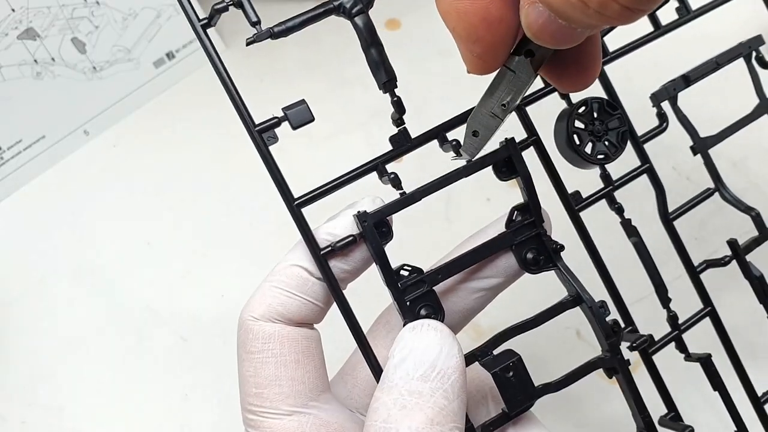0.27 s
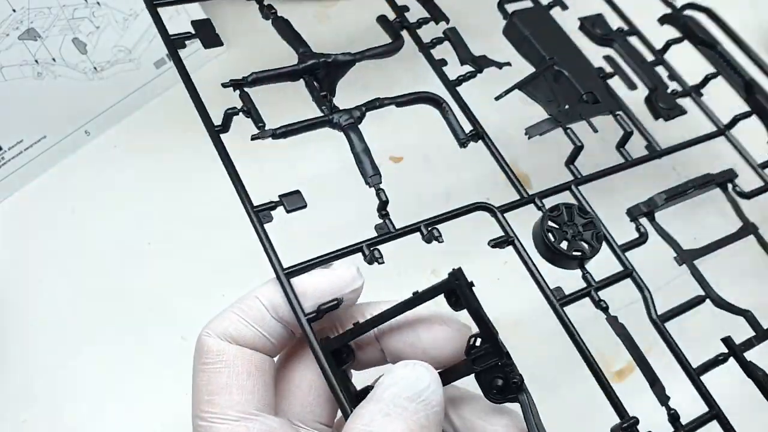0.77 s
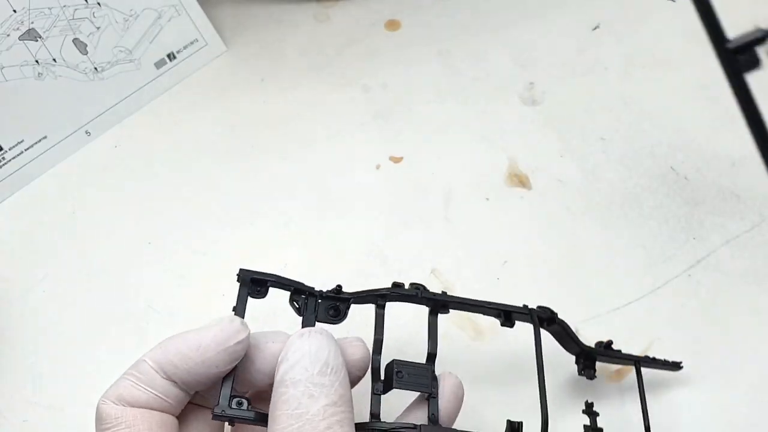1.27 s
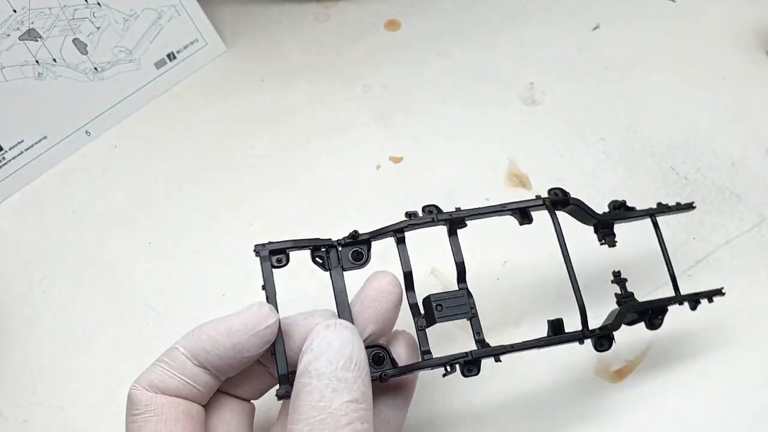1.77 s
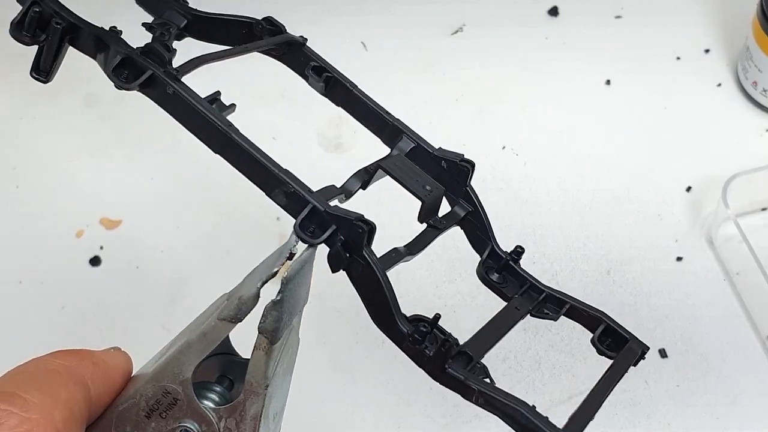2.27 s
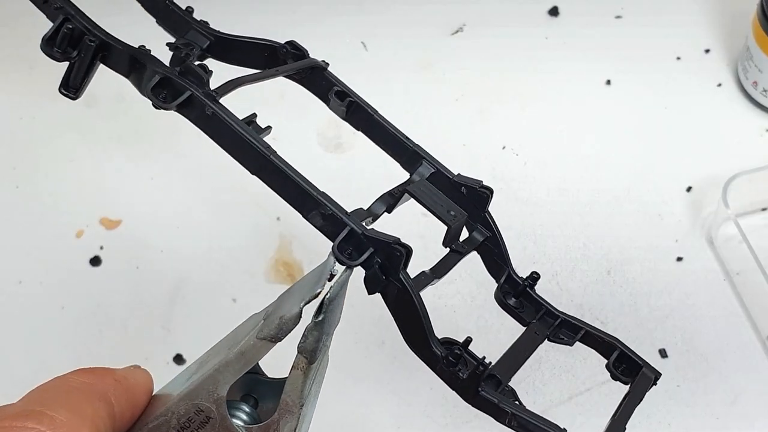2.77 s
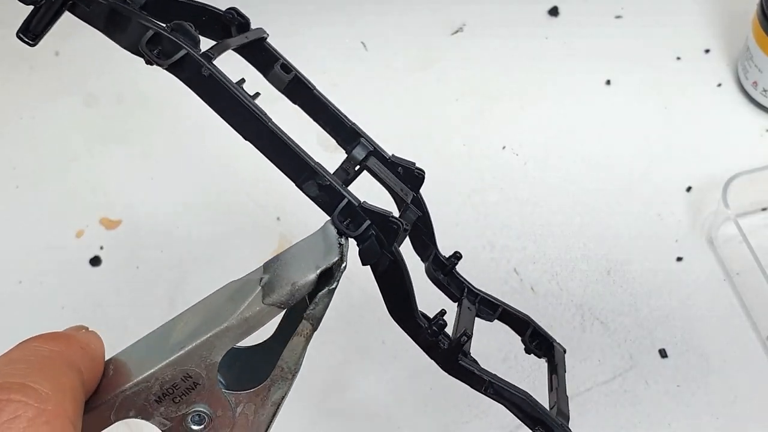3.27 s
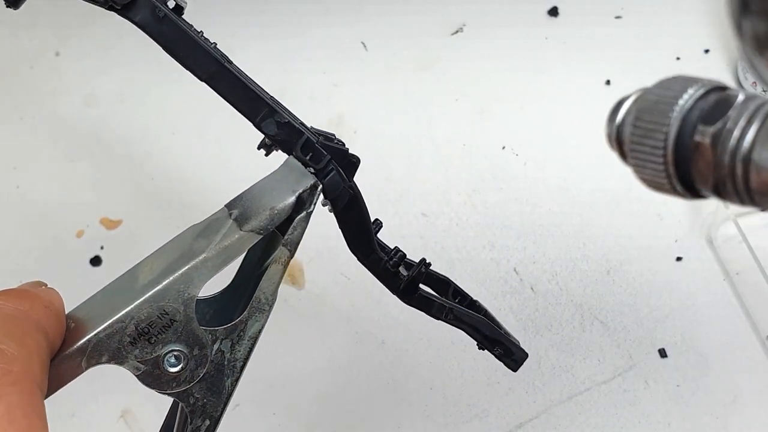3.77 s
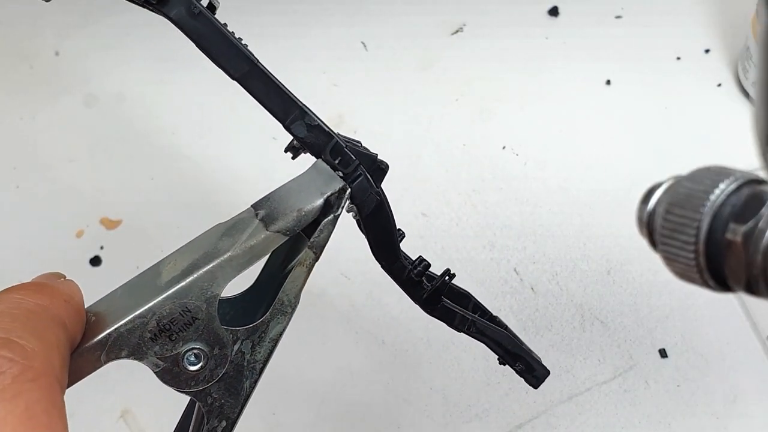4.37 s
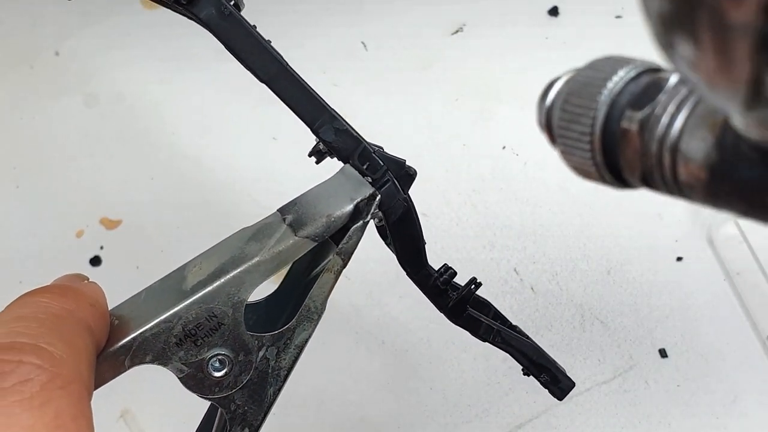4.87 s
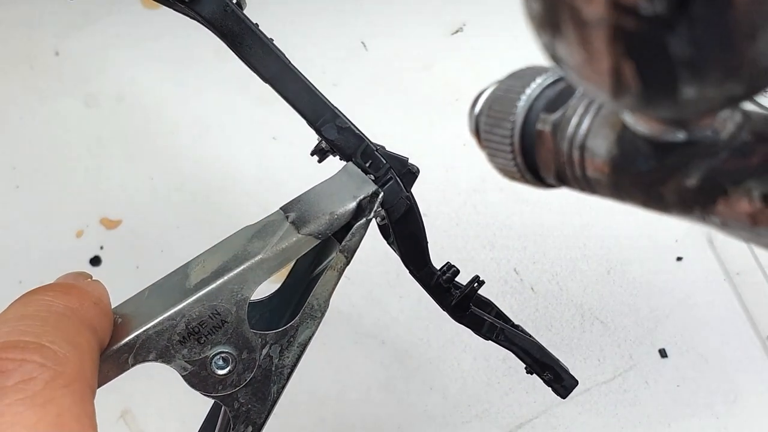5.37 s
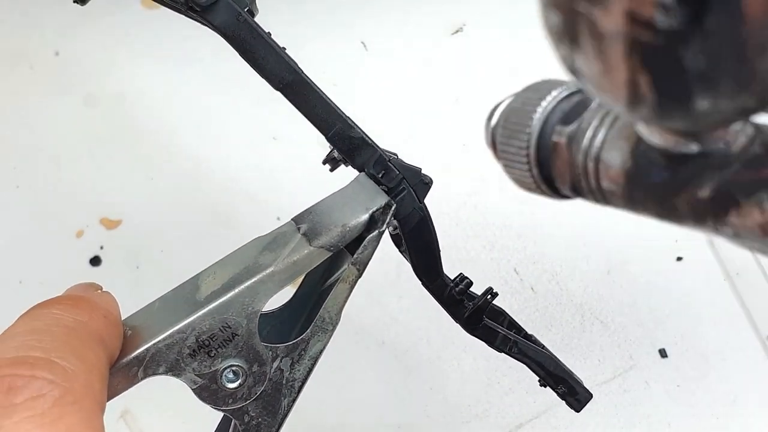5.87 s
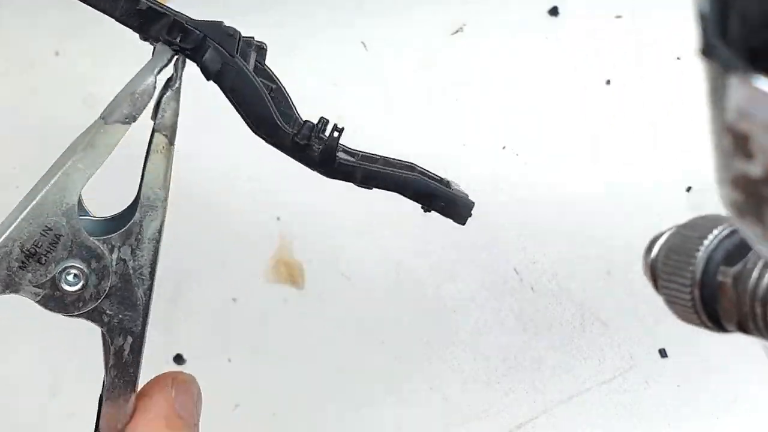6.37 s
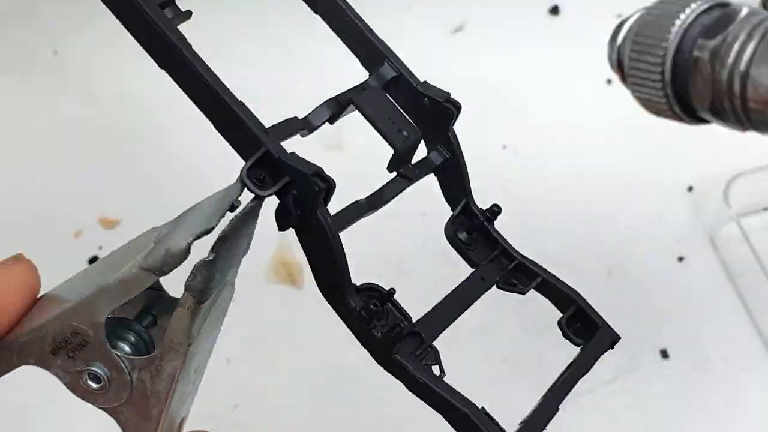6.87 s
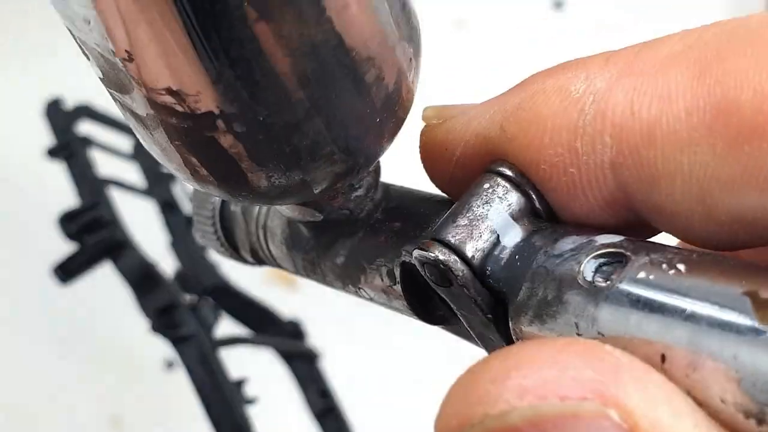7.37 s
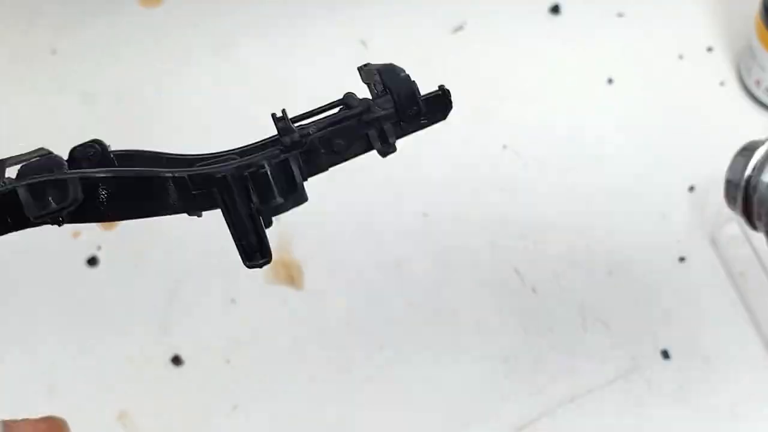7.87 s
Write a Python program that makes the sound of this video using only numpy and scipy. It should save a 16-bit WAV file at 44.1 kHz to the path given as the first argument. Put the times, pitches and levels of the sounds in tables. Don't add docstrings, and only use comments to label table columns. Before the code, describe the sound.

Dry, close phone pickup at a small workbench: gloved fingers rub light plastic, a sharp double-edged snip cracks, smaller snaps follow, then a part taps and bounces. The quiet room abruptly becomes a buzzing low compressor hum through the table. After some light handling, a steady airbrush hiss joins, mostly high and breathy, then fluctuates in quicker strokes with small bumps and clicks, continuing to the end.

```python
import sys
import numpy as np
from scipy import signal
from scipy.fft import rfft, irfft, next_fast_len
from scipy.io import wavfile
from scipy.ndimage import uniform_filter1d, minimum_filter1d

SR = 44100
rng = np.random.default_rng(int(sys.argv[2]) if len(sys.argv) > 2 else 0)


def volts(x):
    e = np.asarray(x, float) / 20
    return 10 ** e


def int16_out(signal):
    q = np.round(np.clip(np.atleast_2d(signal).T, -1, 1) * 32767)
    wavfile.write(sys.argv[1], SR, q.astype(np.int16))


N = 357210
SIZE = next_fast_len(N)
HZ = np.maximum(np.arange(SIZE // 2 + 1) * SR / SIZE, 1)
T = np.arange(N) / SR
CHANGE_S = 2.0225
SHAFT_HZ = 29.55
FAST_S, PIECE_SAMPLES = 5.753, 1024

# hz, share_0_1
LIKENESS = [(60, 0.96), (130, 0.99), (290, 1), (640, 0.75), (1410, 0), (3100, 0.55), (6820, -0.1),
            (15000, 0.07)]


def level(x, db):
    return x * volts(db) / np.sqrt(np.mean(x ** 2))


def on_hz(table, outside=None):
    hz, value = np.transpose(table)
    return np.interp(np.log(HZ), np.log(hz), value, outside, outside)


def on_time(table):
    s, *columns = np.transpose(table)
    return [np.interp(T, s, c) for c in columns]


def pan(db):
    return volts(np.array([db, -db]) / 2).reshape(2, -1)


def hiss(gain, alike):
    alike = np.clip(alike, 0, .995)
    mid, side = rfft(rng.standard_normal((2, SIZE)))
    mid = mid * np.sqrt(1 + alike)
    side = side * np.sqrt(1 - alike)
    return level(irfft(gain * np.array([mid + side, mid - side]), SIZE)[:, :N], 0)


def walk(rate_hz):
    k = int(SR / rate_hz)
    held = np.repeat(rng.standard_normal(N // k + 1), k)
    x = uniform_filter1d(uniform_filter1d(held, k), k)[:N]
    return x / x.std()


def ring(x, modes):
    s = 1j * HZ
    gain = 0
    for k, (hz, width_hz, db) in enumerate(modes):
        gain = gain + (-1) ** k * volts(db) * width_hz * s / (s * s + width_hz * s + hz * hz)
    return irfft(rfft(x, SIZE) * gain / np.sqrt(np.mean(abs(gain) ** 2)), SIZE)[:, :N]


def echoes(x, t60_s, wet_db):
    t = np.arange(int(.2 * SR)) / SR
    tail = rng.standard_normal((2, len(t))) * volts(-60 * t / t60_s)
    tail *= volts(wet_db) / np.sqrt((tail ** 2).sum(1, keepdims=True))
    tail[:, 0] = 1
    return signal.fftconvolve(x, tail, axes=1)[:, :x.shape[1]] / np.sqrt(1 + volts(2 * wet_db))


def plastic():
    # start_s, peak_db, deep_ring_db, frame_ring_db, edge_ring_db
    snips = [(0.2267, -32.5, -13, -18.5, -10.5), (0.256, -16, -32, -34, -22), (0.2574, -21, -30, -31, -16),
             (0.2616, -26, -28, -23, -14), (0.6639, -33.5, -23, -13, -1.5), (.868, -34, -28, -22, -24),
             (0.8705, -34, -31.5, -12, -16), (0.8723, -32.5, -34, -21, -20), (.8915, -46, -25.5, -26, -12),
             (1.2435, -65, -21, -19, -19), (1.8528, -27.5, -19, -7, -8), (1.855, -33.5, -14, -10, -5),
             (1.8583, -41, -14, -12, -2), (1.9244, -50, -5, 2, 1.5), (2.862, -47.5, -3, -11, -6),
             (2.883, -27, -25, -34, -28)]
    # start_s, length_s, air_db, desk_db, part_db
    rubs = [(0, .06, -82, 19.5, 5), (.69, 0.13, -83, -3, -4), (0.038, 0.075, -73, 20, 5.5),
            (0.063, 0.18, -72.5, 13, 7.5), (0.218, 0.037, -57, -1, -7), (0.241, 0.045, -62, 12, 15),
            (.268, .02, -63, 12, 14), (.828, .009, -53, -25, -16), (.79, .026, -59, -18, -18),
            (0.307, .05, -77, -12, -19), (.47, 0.087, -73, -7, -8), (0.542, 0.14, -72, 9, -8),
            (0.592, 0.063, -60, 3.5, 2.5), (0.652, 0.06, -69.5, 13.5, -6), (0.775, 0.045, -70, -12, -12),
            (0.795, 0.053, -70, -11, -10), (0.887, 0.015, -61.5, -23, -15), (0.922, 0.064, -60, -4, 3.5),
            (.943, 0.03, -62, -8, -2), (0.947, 0.15, -73.5, 1, -1.5), (1.24, 0.21, -83, -5, -10),
            (1.4, .4, -85.5, -6.5, -2.5), (1.844, .066, -63.5, 9, 5.5), (1.901, 0.028, -61, 2, -2),
            (1.915, 0.16, -71, 10, 2), (2.904, 0.16, -65, -24, -20), (3.193, 0.57, -72, 8, 5.5)]
    # hz, width_hz, level_db
    deep_modes = [(170, 95, 4), (443, 184, -2), (626, 210, -0.5), (900, 210, -2.5)]
    frame_modes = [(1230, 95, -2.5), (1470, 86, 3), (1930, 210, -3)]
    edge_modes = [(2604, 210, -1), (3185, 140, 0), (4070, 500, -1), (5280, 490, -0.5), (5990, 1200, -5.5)]
    air_modes = [(10660, 2400, 1), (12480, 1400, 3.5), (14050, 2500, -6)]
    hands_pan_db = [-1.5, -1.5, -4, -7]

    crack, rub = np.zeros((2, 4, N))
    for s, db, deep_db, frame_db, edge_db in snips:
        t60_s = 0.023 * np.exp(-0.0645 * (db + 26.5))
        span = slice(int(s * SR), int((s + .2) * SR))
        t = T[span] - T[span][0]
        spike = 1 + 0.91 * np.exp(-t / 0.0019)
        for k, (rel_db, longer) in enumerate([(deep_db, 2.5), (frame_db, 1.8), (edge_db, 1.2), (0, 1)]):
            crack[k, span] += spike * volts(db + rel_db - 9.0 - 60 * t / (t60_s * longer))
    for s, length_s, db, desk_db, part_db in rubs:
        span = slice(int(s * SR), int((s + length_s) * SR))
        part = np.clip((T[span] - s) / length_s, 0, 1)
        swell = np.minimum(part / 0.18, 1) * np.minimum((1 - part) / 0.43, 1) * volts(-5 * part)
        rub[:, span] += np.outer(volts(db + np.array([desk_db, part_db, part_db - 3, 0])), swell)
    drive = crack * volts(2.5 * walk(1500)) + rub * volts(2.6 * walk(400))
    modes = (deep_modes, frame_modes, edge_modes, air_modes)
    side = np.where(T < CHANGE_S, 1, -.3)
    out = 0
    for d, alike, m, pan_db in zip(drive, (0.54, 0.27, 0.3, 0.35), modes, hands_pan_db):
        out = out + ring(d * hiss(1, alike), m) * pan(pan_db * side)
    return out


def ticks():
    # start_s, level_db, centre_hz
    tick_list = [(.2273, -32, 9000), (.2565, -17, 11500), (.2575, -20, 12000), (.2582, -17, 11500),
                 (.2590, -21, 11000), (.2620, -24, 10500), (.2636, -26, 8000), (.6636, -24, 6000),
                 (.6648, -32, 10000), (.8696, -30, 11000), (.8712, -31, 13000), (.875, -31, 12500),
                 (.8731, -26, 12500), (1.8565, -32, 4500), (1.9265, -42, 3500)]
    out, t = np.zeros(N), T[:200]
    for s, db, hz in tick_list:
        decay = np.exp(-t * hz / 0.796)
        out[int(s * SR):int(s * SR) + len(t)] -= volts(db + 4) * np.sin(2 * np.pi * hz * t) * decay
    left = np.roll(out, 2)
    return echoes(np.array([left, out]), .02, -5) * pan(-5)


def landings():
    # start_s, level_db, contact_s
    touches = [
        (1.853, -38.5, 0.0002),
        (1.8555, -40, .0003),
        (1.8637, -37, .002),
        (1.925, -44.5, .0002),
        (1.937, -51, .0004),
        (1.948, -49, 0.0005),
    ]
    # hz, level_db, t60_s
    part_modes = [(129, 1.5, 0.14), (623, -4, 0.084), (846, -1.5, .07), (966, 0, 0.087), (1260, 1.5, 0.043),
                  (1550, -1.5, .035), (1800, -5, .04), (2520, -14, .03), (3800, -9, .04), (4400, -8, .03),
                  (5250, -10, .025)]
    out = np.zeros(N)
    t = T[:int(.3 * SR)]
    hz, db, t60_s = np.transpose(part_modes)[:, :, None]
    chances = rng.standard_normal((len(touches), len(part_modes), 1))
    for (s, hit_db, contact_s), chance in zip(touches, chances):
        strength = volts(hit_db + db + 2.1 * chance - 60 * t / t60_s) / (1 + (hz * contact_s) ** 2)
        modes = strength * np.sin(2 * np.pi * hz * (1 + 0.015 * chance) * t)
        out[int(s * SR):int(s * SR) + len(t)] += modes.sum(0) * (1 - np.exp(-t / 0.0012))
    return out * volts(2.5 * walk(600)) * (T < CHANGE_S - .004) * pan(-3)


def tones(table, waver, rate_hz):
    out = 0
    for s, length_s, hz, db in table:
        swell = np.sin(np.pi * np.clip((T - s) / length_s, 0, 1)) ** 0.31 * volts(2.76 * walk(43.98))
        phase = 2 * np.pi * np.cumsum(hz * (1 + waver * walk(rate_hz))) / SR
        out = out + volts(db) * swell * np.sin(phase)
    return out


def creaks():
    # start_s, length_s, pitch_hz, level_db
    creak_list = [(.598, .024, 3250, -55), (.6, 0.02, 1700, -57), (.618, .02, 1750, -61),
                  (.922, 0.016, 1500, -53), (.94, .028, 1520, -52.5), (0.957, .012, 1300, -54),
                  (.97, .013, 1500, -61), (.243, .014, 1500, -53), (.87, .015, 1520, -51)]
    return tones(creak_list, .045, 300) * pan(-5.5)


def sweeps():
    # start_s, swell_db, drop_db, recovery_s
    passes = [(5.77, 1, 0.5, 0.076), (6.439, 2, -4.5, 0.086), (6.739, -1.5, -4.5, 0.043),
              (7.18, -3.5, -4, 1), (7.525, 4, 2, 0.087), (7.699, 4.5, 0, 0.12), (7.824, 2, -3, 0.04)]
    before, after = 0, 0
    for s, swell_db, drop_db, recovery_s in passes:
        before = before + swell_db * np.exp(-abs(T - s) / 0.066) * (T < s)
        recovery = np.exp(-(np.maximum(T - s, 0) / recovery_s) ** 2)
        after = after + drop_db * recovery * np.clip((T - s) / 0.0091, 0, 1)
    return before, after


def airbrush():
    # start_s, jet_db, paint_wash_db
    nozzle = [
        (3.96, -36.5, -11),
        (4.19, -40, -8),
        (4.6, -36, -9.5),
        (5.23, -38, -7),
        (5.74, -36.5, -8),
        (5.77, -38, -7),
        (6.4, -38, -8.5),
        (8.1, -36, -6),
    ]
    # hz, level_db_per_hz
    jet_spectrum = [(4410, -20.5), (7500, -13), (9380, -3.5), (10500, 5), (13700, 4), (15600, -0.5),
                    (16100, -28.5), (16300, -26)]
    wash_spectrum = [(260, -35), (450, -14), (603, -1), (668, -3.5), (980, -4.5), (1380, -10.5), (1950, -6),
                     (2860, -6.5), (4200, -6.5), (6910, -6.5), (9500, -3.5), (12400, -17), (20900, -120)]
    # hz, left_minus_right_db
    jet_balance = [(60, 4.0), (110, 4.0), (200, 3.5), (380, 2.5), (700, 3.0), (1290, 2.5), (2380, 2.0),
                   (4400, 16.5), (8120, -4.5), (15000, 12)]
    moves_s = [4.0, 4.35, 4.7, 5.05, 5.4, 5.7, 5.9, 6.15, 6.4, 6.6, 6.8, 7.05, 7.3, 7.55, 7.8, 8.1]
    trigger_s, open_s, leak_db = 3.957, 0.051, -40.5

    (jet_db, wash_db), (before, after) = on_time(nozzle), sweeps()
    jet_db = jet_db + before + after + leak_db * np.clip((trigger_s - T) / open_s, 0, 2)
    wash_db = wash_db + 0.62 * after
    jet_pan_db = 4 - 0.1 * after
    tilt = volts(np.array([1, -1])[:, None] * (on_hz(jet_balance) - 4.5) / 2)
    flutter_db = 0.17 * walk(35) + 0.77 * walk(250)
    jet = hiss(volts(on_hz(jet_spectrum, -150)) * tilt, 0.12)
    jet = jet * volts(jet_db + 1.5 + flutter_db) * pan(jet_pan_db)
    wash_db = jet_db + wash_db + 1.5 + 0.7 * flutter_db + 0.67 * walk(30)
    wash = hiss(volts(on_hz(wash_spectrum, -150)), 0.21) * volts(wash_db) * pan(3.2)
    spray = jet + wash
    out = np.zeros((2, N))
    for here in np.eye(len(moves_s)):
        share = np.sqrt(np.interp(T, moves_s, here))
        span = slice(np.argmax(share > 0), N - np.argmax(share[::-1] > 0))
        out[:, span] += share[span] * echoes(spray[:, span], .1, -4)
    place = np.maximum(T - FAST_S, 0) * SR / PIECE_SAMPLES
    return out * np.sqrt(1 - np.sin(np.pi * place) ** 2 / 2)


def crossings():
    # start_s, length_s, centre_hz, relative_width, level_db
    puffs = [(4.45, 0.52, 4220, 0.037, -54), (5.74, 0.074, 885, 0.27, -46.5),
             (6.096, 0.11, 850, 0.27, -50.5), (6.407, .035, 4600, 0.23, -44.5),
             (6.55, 0.11, 900, 0.56, -52), (6.644, .035, 1300, .5, -49.5), (6.714, 0.022, 5100, 0.24, -48),
             (7.158, 0.033, 4600, 0.23, -46), (7.85, 0.054, 1100, 0.54, -51),
             (8.061, 0.038, 2200, 0.49, -44.5)]
    out = 0
    for s, length_s, hz, width, db in puffs:
        swell = np.sin(np.pi * np.clip((T - s) / length_s, 0, 1))
        out = out + volts(db) * swell * hiss(1 / (1 + ((HZ - hz) / (width * hz)) ** 4), 0.42)
    return out * pan(4.3)


def squeeze(x):
    place = np.maximum(T - FAST_S, 0) * SR / PIECE_SAMPLES
    piece = place.astype(int)
    fade = np.sin(np.pi / 2 * (place % 1)) ** 2
    starts = np.minimum(FAST_S * SR + PIECE_SAMPLES * np.arange(piece[-1] + 2), N - 1).astype(int)
    slip_s = np.cumsum(.0008 * walk(14)[starts])
    back_s = rng.integers(1, 12, len(starts)) * 8 / SHAFT_HZ + slip_s
    back_s[0] = 0

    def read(k):
        return x[:, np.clip(np.arange(N) - (back_s[k] * SR).astype(int), 0, N - 1)]

    return (1 - fade) * read(piece) + fade * read(piece + 1)


def compressor():
    # shaft_multiple, level_db
    weak_orders = [(2, -47.5), (3, -44.5), (5, -42), (6, -42), (7, -41.5), (10, -51), (11, -53), (12, -60)]
    # hz, level_db_per_hz
    rumble_spectrum = [(13, -54.5), (60, -11.5), (128, -2.5), (158, 1), (200, -8), (228, -8.5), (248, -8.5),
                       (260, -11.5), (290, -15.5), (334, -16.5), (419, -32), (490, -40), (601, -33.5),
                       (1000, -73)]
    intake_spectrum = [(260, -19.5), (450, -6), (492, -11), (625, -8.5), (922, -18), (1780, -19.5),
                       (2130, -20.5), (3140, -25), (4560, -22.5), (7690, -26), (9340, -35.5), (14200, -38),
                       (15900, -41)]
    magnet_hz, table_hz = 240., 161.1

    turn = 2 * np.pi * SHAFT_HZ * T
    magnet = 2 * np.pi * magnet_hz * T
    lines = volts(-29 + 1.0 * walk(5.98)) * np.cos(4 * turn + 0.1 * walk(6))
    lines = lines + volts(-31 + 1.02 * walk(13)) * np.cos(magnet)
    lines = lines + volts(-43 + 1.3 * walk(7)) * np.cos(magnet + turn)
    table_phase = 2 * np.pi * np.cumsum(table_hz + 9 * walk(7)) / SR + 0.85 * walk(25)
    lines = lines + volts(-32.5 + 2.7 * walk(25) + 3.2 * walk(5)) * np.cos(table_phase)
    for multiple, db in weak_orders:
        phase = int(multiple) * turn + .5 * walk(9) + rng.uniform(0, 5.58)
        lines = lines + volts(db + 2.3 * walk(7)) * np.cos(phase)
    alike = on_hz(LIKENESS)
    rumble = hiss(volts(on_hz(rumble_spectrum, -150)), alike) * volts(-28.5 + 0.67 * walk(6))
    intake = hiss(volts(on_hz(intake_spectrum, -150)), alike) * volts(-56 + 2.0 + 0.85 * walk(3.27))
    intake = echoes(intake, .15, -9) * volts(0.32 * np.cos(turn)) * pan(0.51)
    left, right = squeeze(lines + rumble + intake) * pan(3.74)
    return np.array([left, np.roll(right, 3)]) * np.clip((T - CHANGE_S) / .002, 0, 1)


def thuds():
    # start_s, level_db, push_s
    pushes = [
        (7.662, -35, 0.014),
        (8.048, -35, 0.00066),
        (8.066, -32, 0.00055),
    ]
    # start_s, level_db, settling_s
    jumps = [
        (2.0225, -25.5, 0.0011),
        (5.7515, -26, 0.00075),
        (5.7566, -18, 0.0011),
        (7.8154, -15.5, 0.00088),
    ]
    out = 0
    for s, db, push_s in pushes:
        t = np.maximum(T - s, 0) / push_s
        out = out + volts(db) * np.sin(np.pi * t) * np.exp(-t / 4.1)
    for s, db, settle_s in jumps:
        rise = np.clip((T - s) / .0002, 0, 1)
        out = out + volts(db) * rise * np.exp(-np.maximum(T - s, 0) / settle_s)
    return out * pan(3.6)


def whines():
    # start_s, length_s, pitch_hz, level_db
    whine_list = [(.594, .045, 11400, -62), (1.79, .06, 830, -78), (3.46, .2, 1480, -66),
                  (.98, 0.23, 203, -59.5), (1.465, 0.18, 1460, -83), (3.39, 0.165, 990, -57.5),
                  (3.39, 0.19, 1570, -66), (3.58, .17, 1560, -68), (3.25, .12, 1790, -69),
                  (3.28, .05, 900, -64), (3.6, .15, 990, -68), (4.4, 0.17, 1660, -60),
                  (4.8, 0.18, 1560, -59), (4.6, 0.22, 1500, -62)]
    return tones(whine_list, .005, 60) * pan(-1.5)


def quiet_room():
    # hz, level_db_per_hz
    room_spectrum = [(15, -55), (25, -21.5), (44, -14), (66, -5.5), (108, -15.5), (175, -17), (212, -20),
                     (270, -38), (887, -55.5), (1440, -52.5), (7110, -71.5), (11300, -59.5), (16000, -69.5)]
    # start_s, length_s, pitch_hz, level_db
    swells = [(0, 0.31, 83.6, -48), (.36, 0.34, 62.34, -51), (.68, 0.24, 65, -53), (.98, 0.17, 62, -51),
              (1.27, 0.16, 63.2, -48), (1.48, 0.2, 61.3, -50.5), (1.67, 0.59, 83.9, -49.5)]
    gain = volts(on_hz(room_spectrum, -150))
    low = 1 / (1 + (HZ / 330) ** 6)
    hum = hiss(gain * low, on_hz(LIKENESS)) * volts(-58.5 + 0.5 * walk(9.4))
    hum = (hum + tones(swells, 0.035, 17)) * pan(-3)
    floor = hiss(gain * (1 - low), .05) * volts(-76 + 1.5 * walk(18)) * pan(-2.5)
    return (hum + floor) * np.clip((CHANGE_S - .004 - T) / 0.0037, 0, 1)


def scene():
    hands = plastic() + ticks() + landings() + creaks()
    spraying = airbrush() + crossings() + compressor() + thuds()
    return hands + spraying + whines() + quiet_room()


def mask(x, under_db, loud_db):
    hz, _, z = signal.stft(np.array([x[0] + x[1], x[0] - x[1]]) / 2, SR, "hann", 2048, 1536)
    power = abs(z) ** 2
    band = uniform_filter1d(uniform_filter1d(power, size=4, axis=1), size=3, axis=2)
    near = uniform_filter1d(uniform_filter1d(power, size=36, axis=1), size=7, axis=2)
    treble = minimum_filter1d(band[:, hz > 9000].mean(1, keepdims=True), size=8, axis=2)
    dips = band < near * volts(2 * under_db)
    hidden = treble > near * volts(2 * loud_db)
    drop = dips & hidden & (hz > 1200)[:, None]
    keep = minimum_filter1d(np.where(drop, .01, 1), size=3, axis=2)
    keep = minimum_filter1d(keep, size=4, axis=1)
    mid, side = signal.istft(z * keep, SR, "hann", 2048, 1536)[1][:, :N]
    return np.array([mid + side, mid - side])


def band_limit(x):
    return signal.sosfilt(signal.butter(12, 16850, fs=SR, output="sos"), x)


def record(dry):
    top_hz = 15850
    cut = signal.sosfilt(signal.ellip(12, .2, 80, top_hz, fs=SR, output="sos"), dry)
    mix = mask(cut, under_db=-6.3, loud_db=6.5)
    return band_limit(mix)


dry = scene()
out = record(dry)
int16_out(out)
```